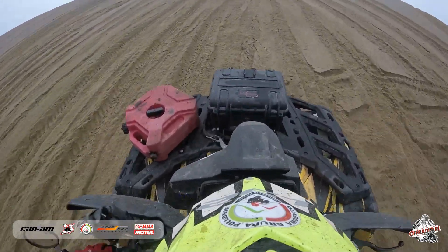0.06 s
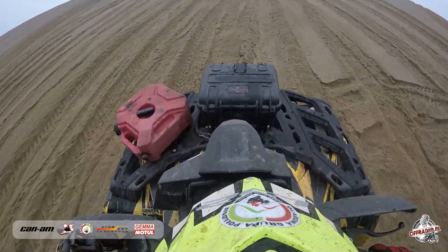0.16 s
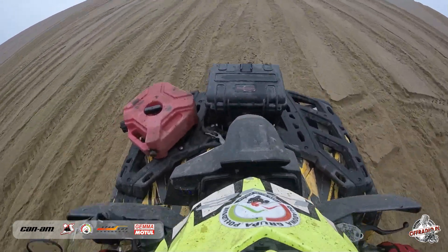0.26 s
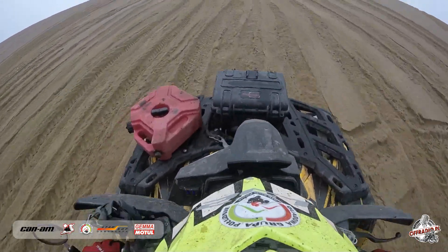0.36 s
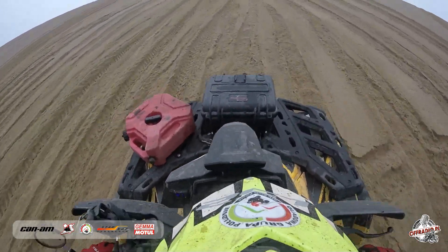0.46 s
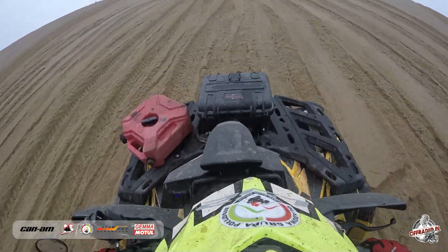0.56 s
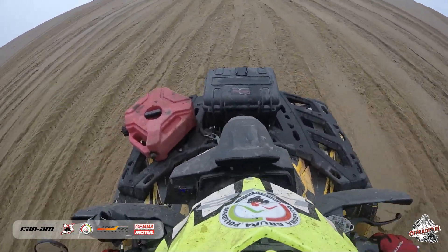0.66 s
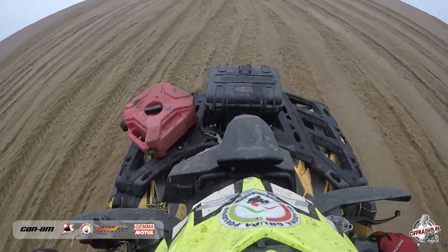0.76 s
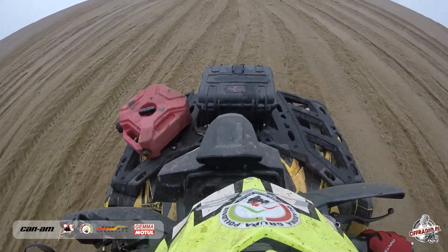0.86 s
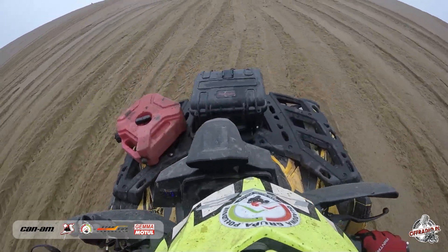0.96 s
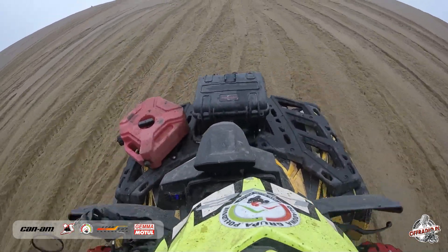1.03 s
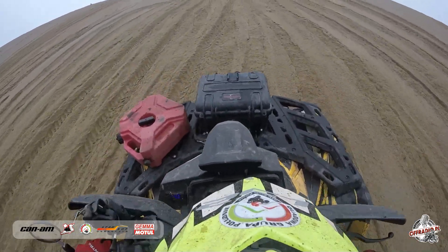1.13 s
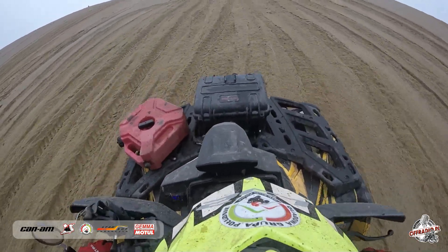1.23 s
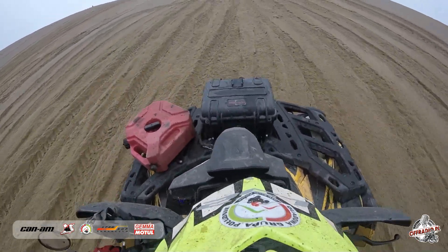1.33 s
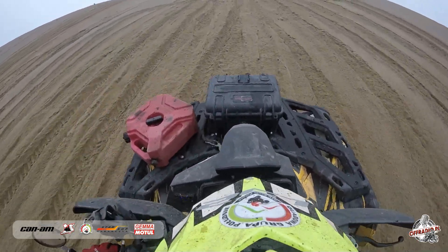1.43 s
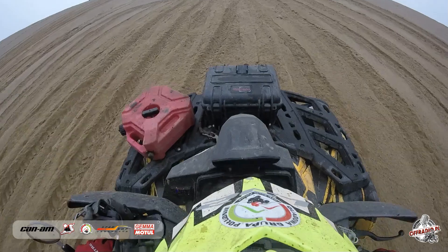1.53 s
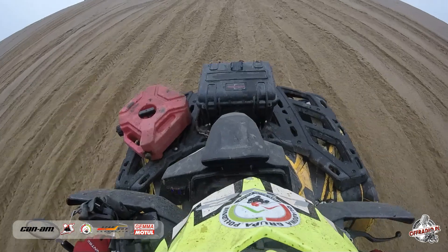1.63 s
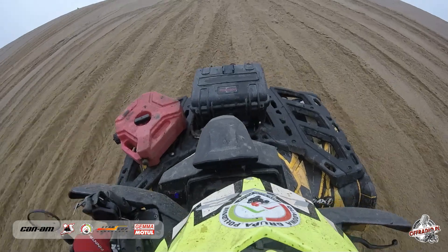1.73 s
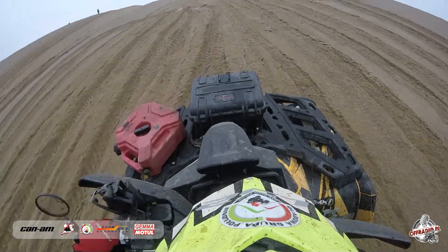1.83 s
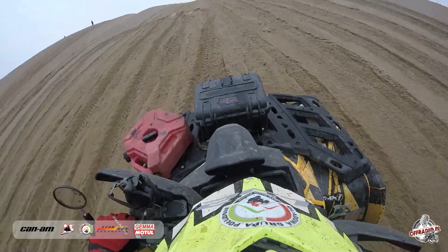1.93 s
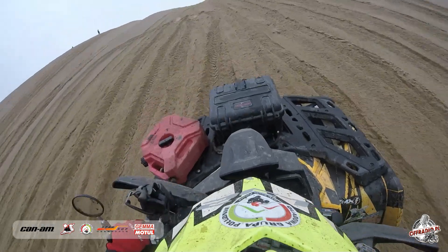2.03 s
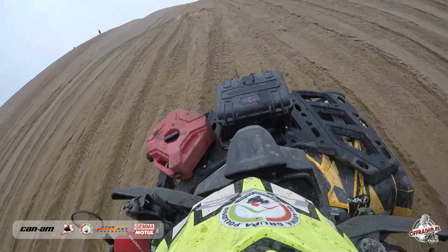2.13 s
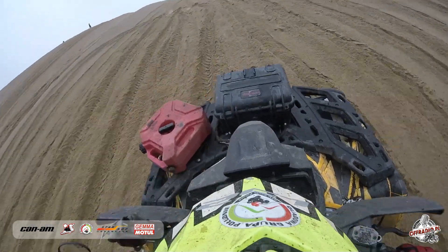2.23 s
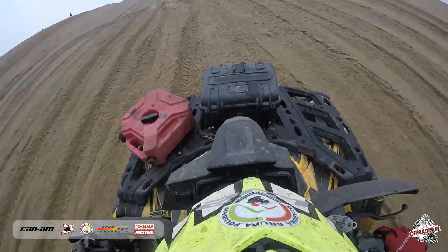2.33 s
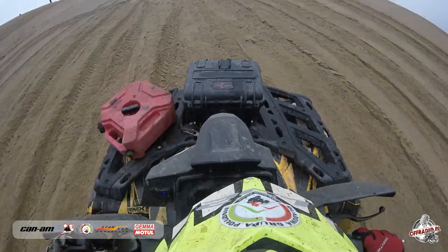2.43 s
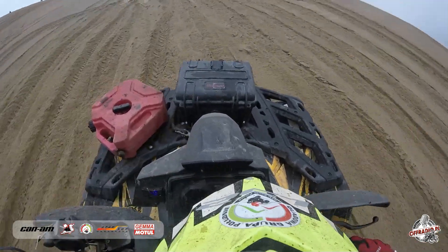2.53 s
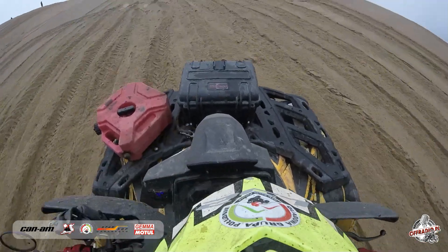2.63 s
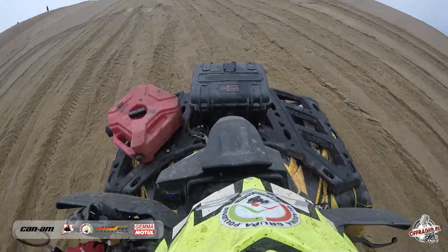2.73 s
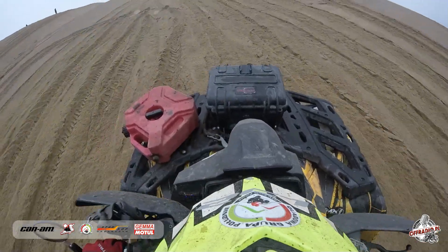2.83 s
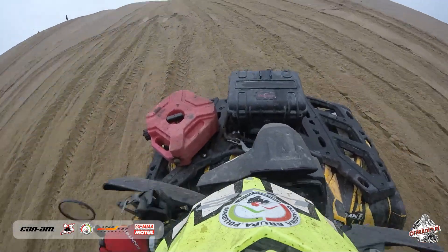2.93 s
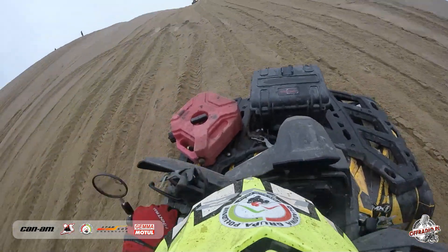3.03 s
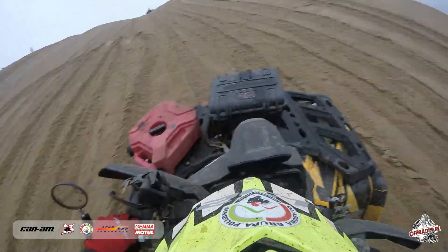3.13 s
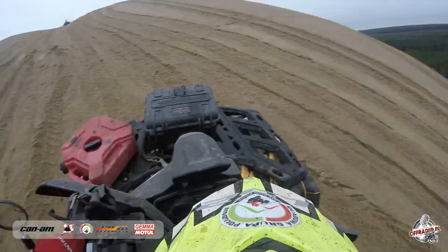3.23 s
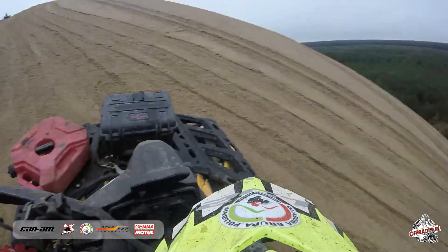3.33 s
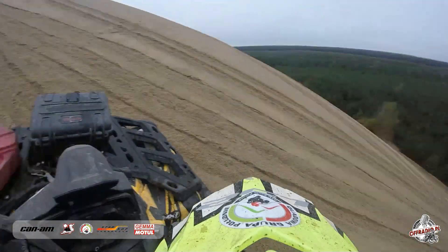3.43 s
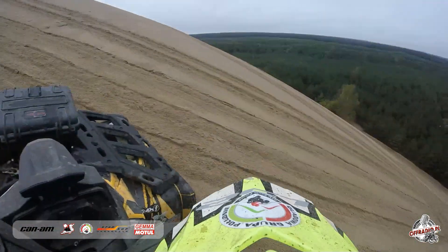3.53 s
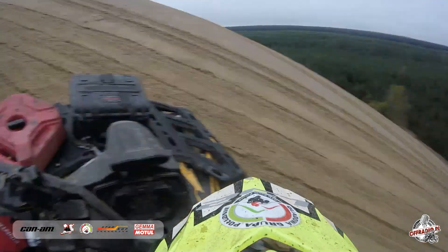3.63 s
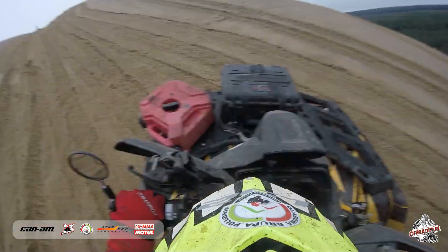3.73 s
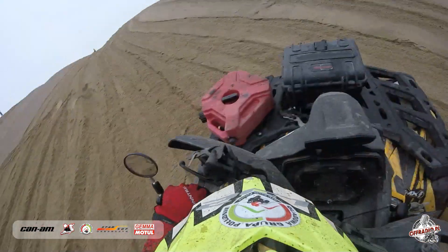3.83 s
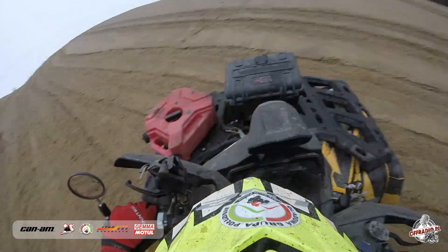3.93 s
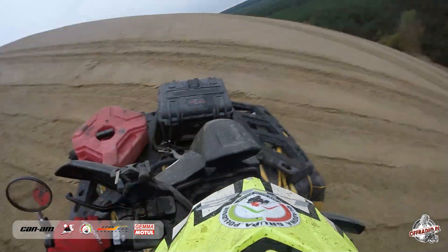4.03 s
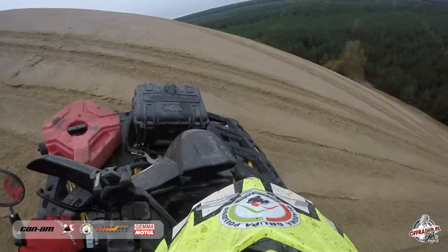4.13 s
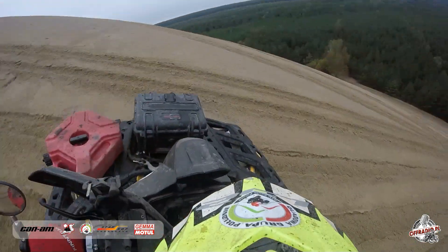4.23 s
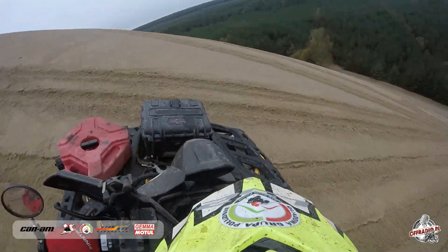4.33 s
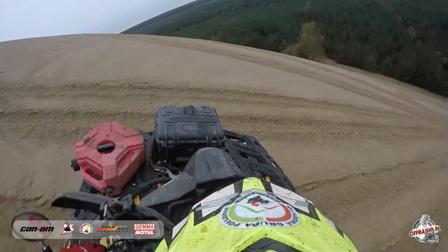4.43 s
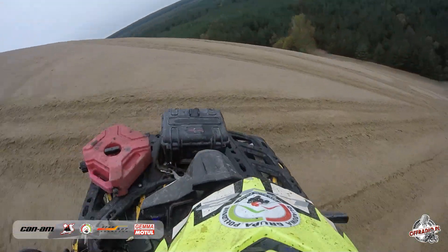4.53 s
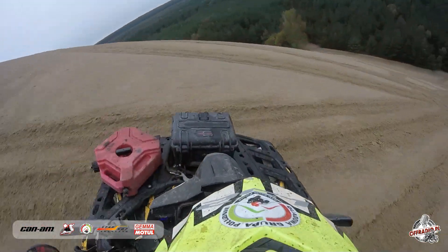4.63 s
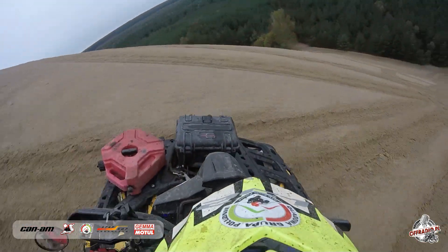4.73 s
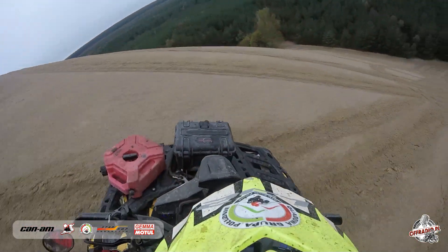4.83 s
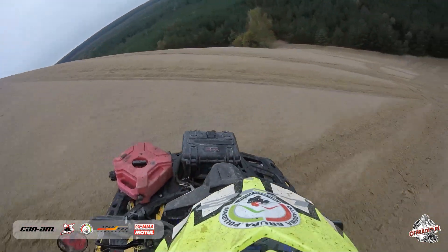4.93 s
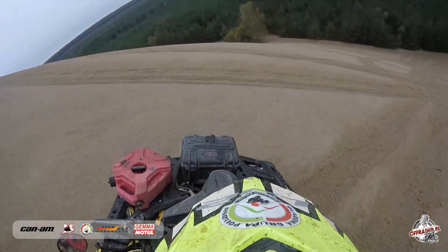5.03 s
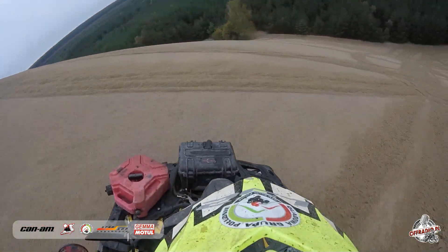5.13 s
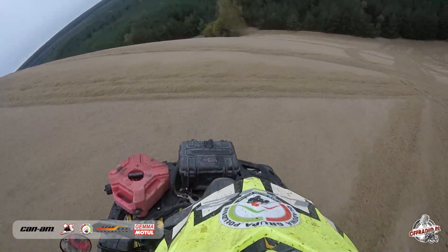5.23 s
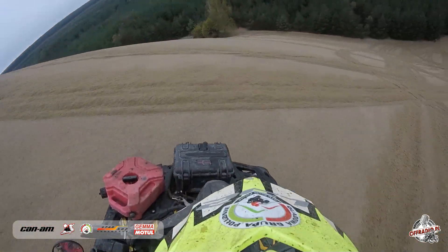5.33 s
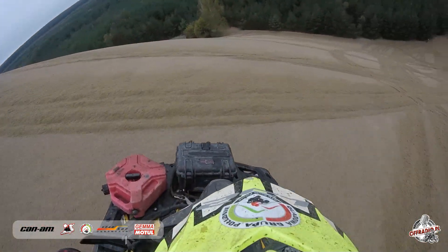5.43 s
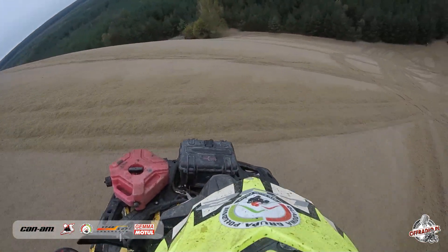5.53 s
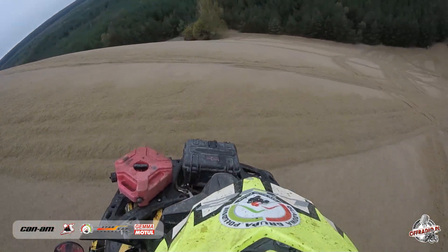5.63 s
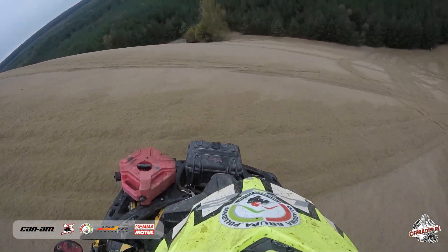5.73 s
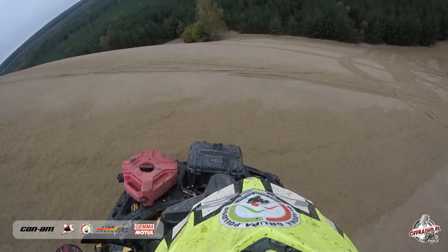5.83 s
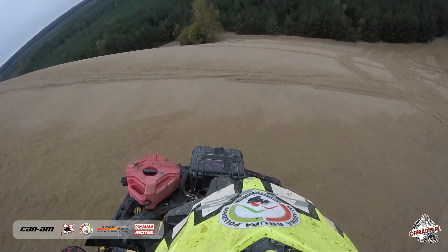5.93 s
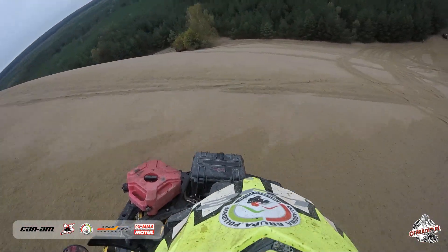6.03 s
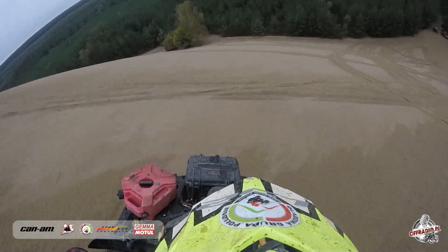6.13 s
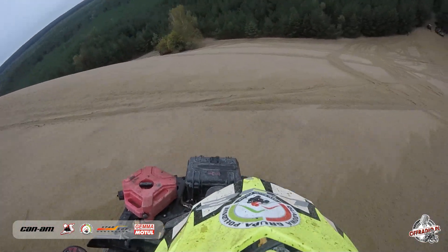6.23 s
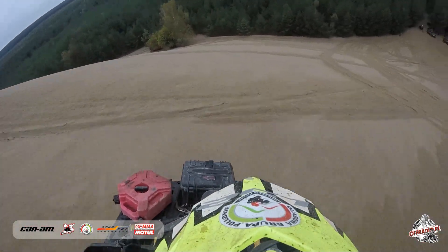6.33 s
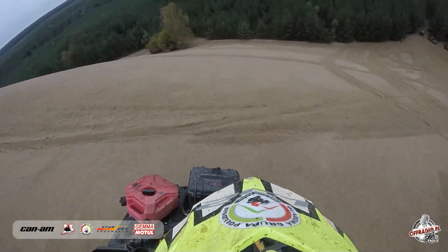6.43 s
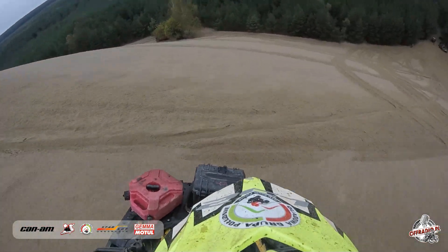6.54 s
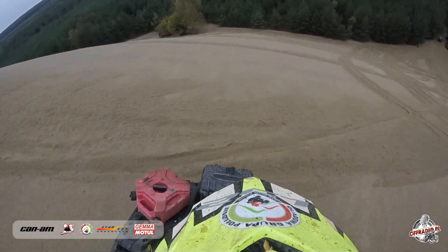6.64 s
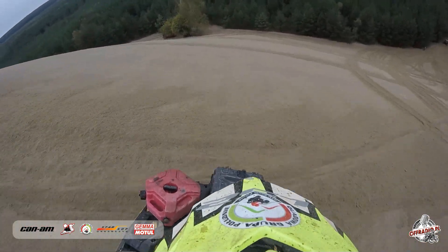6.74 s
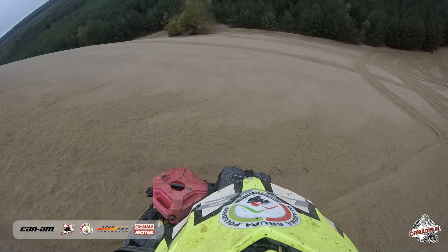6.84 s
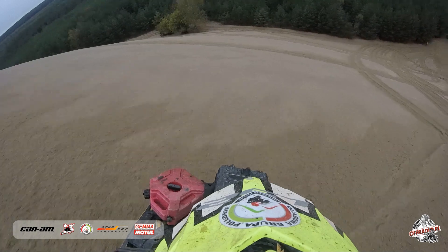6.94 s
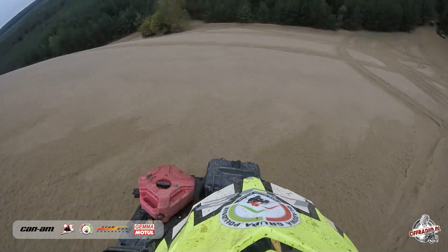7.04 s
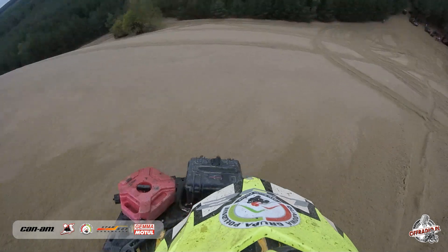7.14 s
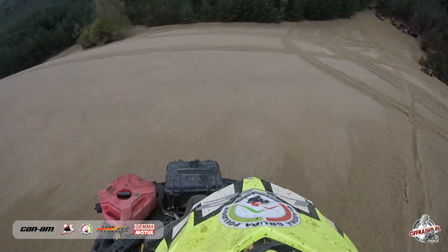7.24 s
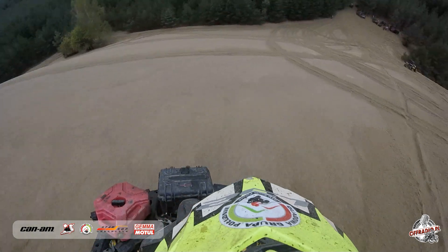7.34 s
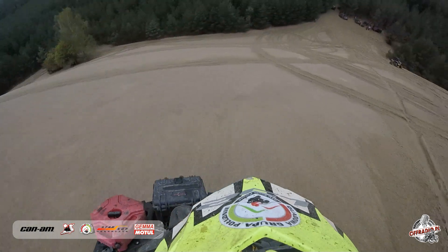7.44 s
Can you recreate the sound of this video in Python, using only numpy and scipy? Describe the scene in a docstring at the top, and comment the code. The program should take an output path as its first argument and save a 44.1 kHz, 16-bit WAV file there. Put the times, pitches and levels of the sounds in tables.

```python
"""A V-twin quad bike climbs a sand slope at full throttle, rolls off at the crest and drops to a hunting idle.
Its uneven firing radiates a harmonic series from the exhaust. The microphone sits in a closed plastic
case on the helmet, and every blow of valve or piston excites the case's resonance near 1.5 kHz.
Belt and intake rush, the casing hisses and panels ring. A low engine tone slides down as the revs fall,
a gear change knocks and gears whine faintly; behind are rolling noise, wind and two ticks of sand."""
import sys
import numpy as np
from scipy import signal
from scipy.fft import rfft, irfft, next_fast_len
from scipy.io import wavfile
from scipy.ndimage import uniform_filter1d, minimum_filter1d, map_coordinates

SR = 44100
rng = np.random.default_rng(int(sys.argv[2]) if len(sys.argv) > 2 else 0)


def dump(signal):
    """Clip the signal to [-1, 1] and save it as 16-bit WAV at the path in sys.argv[1]."""
    limited = np.clip(np.atleast_2d(signal).T, -1, 1)
    pcm = np.round(limited * 32767).astype(np.int16)
    wavfile.write(sys.argv[1], SR, pcm)


N = 329427
SHUT_S, NOISE_FADE_S = 4.36, 0.7  # the throttle shuts; the engine's noises fade as the revs fall


def exhaust(turns, cycle_hz):
    """Periodic firing radiates harmonics of the engine cycle; off throttle, pipe resonance shapes them."""
    # exhaust harmonics: order, load_db, shut_db (before the pipe colours it)
    orders = [(1, -46, -46), (2, -35.5, -42.5), (3, -32, -39.5), (4, -41, -38.5), (5, -31.5, -49),
              (6, -44, -48), (7, -47.5, -42.5), (8, -40, -47), (9, -39.5, -46.5), (10, -42, -48.5),
              (11, -37, -48), (12, -51.5, -61), (13, -52, -61), (14, -57, -62), (15, -60.5, -65)]
    # pipe response with the throttle shut: frequency_hz, gain_db
    pipe = [(25, -20), (45, -6.5), (65, -7.5), (95, 0.5), (125, -10.5), (200, -10.5), (400, -18.5),
            (800, -20)]
    # booms as the idle catches, keyed by order: centre_s, length_s, swell_db
    catches = {3: [(4.95, 0.19, 12.5), (5.55, 0.15, 17), (6.04, 0.26, 14.5), (6.32, 0.14, 13),
               (6.54, .08, 9), (6.71, .08, 7), (6.88, .1, 12.5), (7.13, .1, 3), (7.45, .08, 4)],
               4: [(5.2, .2, 2), (6.28, 0.068, 2), (6.45, 0.068, 7.5), (6.71, .08, 9.5), (6.93, .12, 6.5),
               (7.13, 0.18, 8.5), (7.39, 0.071, 4)]}
    firing_gap, between_catches_db = 280 / 720, -8.5  # the gap is a share of the cycle
    out, t = np.zeros(N), np.arange(N) / SR
    angle = 2 * np.pi * (turns - .12) + .02 * wobble(14)  # the crank turns a little unevenly
    overrun_db = 5.5 * np.clip((4.84 - t) / 0.04, 0, 1)  # wheels drive the engine until the belt lets go
    ease_db = -8.5 * np.clip(1 + (t - SHUT_S) / .2, 0, 1)  # the throttle eases: upper orders sag first
    pipe_hz, pipe_db = np.transpose(pipe)
    for k, load_db, shut_db in orders:
        idle_db = shut_db + np.interp(np.log(k * cycle_hz), np.log(pipe_hz), pipe_db) + 2.9 * wobble(10)
        idle_db += overrun_db + (between_catches_db + swells(catches[k]) if k in catches else 0)
        shut = ramp(length_s=0.12 if k <= 5 else 0.15)
        db = (1 - shut) * (load_db + (k > 5) * ease_db + 1.1 * wobble(3.49)) + shut * idle_db
        twin_phase = np.angle(1 + .4 * np.exp(-2j * np.pi * k * firing_gap))
        lag = 1.1 * max(k - 6, 0) ** 2  # the silencer delays what lies above its resonance
        out += amp(db + 0.37 * wobble(18)) * np.cos(k * angle + twin_phase - lag)
    return np.sqrt(2) * out


def clatter(turns, level_db):
    """Impulse excitation: valve and piston blows, each trailing chatter, ring the plastic case."""
    # blows within one cycle: cycle_share, level_db
    blows = [(.15, -6), (.42, -10), (.51, -10), (.67, 0), (.89, -9)]
    # the hardest piston blows: time_s, level_db
    hard_blows = [(0.361, -2.5), (0.4378, -5), (0.7291, -6), (0.7675, -6.5), (0.9786, -8.5), (1.3467, -4.5),
                  (1.3851, -7), (1.463, -11), (1.6196, -0.5), (1.6974, -4.5), (1.9284, -7.5), (2.2412, -6),
                  (2.3579, -4.5), (2.5714, -5.5), (2.7271, -4), (2.7655, -8.5), (3.0918, -4.5),
                  (3.2284, -3), (3.2479, -5), (3.5946, -8.5), (3.7697, -2.5), (3.848, -2.5), (3.9817, -3),
                  (4.0396, -6), (4.0591, -3.5), (4.3085, -7.5)]
    crest_db = 9.5  # peak of an ordinary main blow over the clatter's level
    cycles = np.arange(int(turns[-1]) - 1)
    hard_s, hard_db = np.transpose(hard_blows)
    hits, gate = np.zeros(N + 1), np.full(N, .15)
    for share, db in blows:
        wander, scatter, force = rng.standard_normal((len(cycles), 3)).T
        # play in the valve gear shifts the timing, more for the lighter blows
        late = amp(-db) * (.006 * uniform_filter1d(wander, size=9) + .0008 * scatter)
        at = np.interp(cycles + share + late, turns, np.arange(N))
        whole = at.astype(int)
        gap_s = np.abs(at[:, None] / SR - hard_s)
        hard_size = amp(hard_db[gap_s.argmin(axis=1)] - level_db[whole] - crest_db)
        size = np.where(gap_s.min(axis=1) < .002, hard_size, amp(db + 1.67 * force))
        hits += np.bincount(whole, size * (1 - at + whole), N + 1)  # split between adjacent samples
        hits += np.bincount(whole + 1, size * (at - whole), N + 1)
        gate += amp(db) * np.exp(-((turns - share) % 1) / 0.75)
    # slower turning gives fewer blows at the same mean power
    hits = hits[:N] / np.sqrt(np.abs(uniform_filter1d(hits[:N] ** 2, SR // 5)) + 1e-12)
    chatter = unit(gate * amp(0.43 * wobble(40)) * rng.standard_normal(N))
    chatter_share = np.interp(level_db, [-36, -22], [.6, .2])
    drive = np.sqrt(1 - chatter_share) * hits + np.sqrt(chatter_share) * chatter
    return amp(level_db) * case_ring(drive, rise_s=0.00072)


def case_ring(drive, rise_s=1e-6):
    """Resonance: the closed plastic case answers any blow most strongly near 1.5 kHz."""
    # response of the case: frequency_hz, gain_db
    response = [(470, -43.5), (800, -25), (976, -40.5), (1150, -21.5), (1290, -21.5), (1350, -8.5),
                (1390, -15), (1435, 3), (1520, 4.5), (1620, -3), (1715, 1.5), (1800, -8), (2050, -20.5),
                (2170, -24.5), (2700, -30.5), (4000, -68)]
    return coloured(drive, response, rise_s)


def rush(turns, level_db):
    """Amplitude modulation: belt and intake noise pulses slightly once an engine cycle."""
    # belt and intake spectrum: frequency_hz, relative_db
    spectrum = [(1350, -16), (2300, -1), (2440, -3), (2800, -10.5), (3190, -6), (3710, -15.5),
                (4140, -12.5), (4460, -18), (4820, -28), (5000, -27), (6500, -54.5), (11000, -120)]
    pulse_db = 0.31 * np.cos(2 * np.pi * (turns - .55))
    return amp(level_db + pulse_db + 0.24 * wobble(60)) * patchy(spectrum, patchy_db=0.5)


def sizzle(turns):
    """Resonant filtering: the engine casing hisses through its metallic modes, fading with the revs."""
    # engine casing spectrum: frequency_hz, relative_db
    spectrum = [(3500, -43.5), (4800, -22), (5200, -12), (5560, -4), (5800, -6), (6200, 0.5), (6650, -9),
                (7000, -9), (7450, -11), (7950, -8.5), (8400, -18), (8900, -14.5), (9600, -22),
                (11500, -31), (15200, -37)]
    load_db, shut_db = -47.5, -65.5
    db = load_db + (shut_db - load_db) * ramp(length_s=0.61) ** 1.56 + 0.4 * wobble(3.2)
    pulse_db = 0.94 * np.cos(2 * np.pi * (turns - .55))
    return amp(db + pulse_db + 0.28 * wobble(60)) * patchy(spectrum, patchy_db=1.5)


def panels(turns):
    """Forced vibration: firing and rattle drive narrow modes of the bodywork, silent once it idles."""
    # body panel modes: centre_hz, width_hz, level_db
    modes = [(332, 22, -45), (2184, 80, -40.5), (2367, 39, -48.5), (3152, 150, -45), (4070, 78, -55.5)]
    # a panel sings out, keyed by mode index: centre_s, length_s, swell_db
    sings = {1: [(2.6, 0.27, 2), (2.97, .12, 4.5)], 2: [(2.9, 0.27, 10.5), (3.3, .12, 7)],
             4: [(3.6, .45, 10.5), (4.3, .3, 3)]}
    driven_share, swing_db, shut_db = .85, 2, -10
    m = next_fast_len(N)
    out, hz, shut = np.zeros(N), np.fft.rfftfreq(m, 1 / SR), ramp(NOISE_FADE_S)
    kicks = unit(np.diff(np.floor(turns), prepend=0))  # one a cycle
    for k, (centre_hz, width_hz, db) in enumerate(modes):
        shake = np.sqrt(driven_share) * kicks + np.sqrt(1 - driven_share) * rng.standard_normal(N)
        ring = irfft(rfft(shake, m) / (1 + (2 * (hz - centre_hz) / width_hz) ** 2), m)
        out += amp(db + swells(sings.get(k, [])) + swing_db * wobble(5.5)) * unit(ring[:N])
    return out * amp(shut_db * shut) * np.sqrt(1 - shut)


def gear_knocks():
    """Impact and free decay: each gear contact rings the case, cracks and thumps the frame's modes."""
    # the gear knock and its rebounds: time_s, level_db, thump_relative_db
    contacts = [(5.424, -10.5, -32), (5.4252, -9.5, -29), (5.428, -10.5, -11.5), (5.433, -38, -26),
                (5.437, -24.5, -3), (5.466, -34.5, -12), (6.11, -43, -20), (6.14, -33, -9)]
    # frame modes: pitch_hz, relative_db, t60_s
    modes = [(99, -0.5, 0.14), (198, -7.5, 0.14), (263.4, -4.5, 0.21), (419, -12, 0.15), (2660, 1, 0.031),
             (3630, -6, 0.027)]
    # spectrum of the crack: frequency_hz, relative_db
    crack_spectrum = [(700, -38), (1200, -16), (2000, 2.5), (2700, -3), (3200, -7), (3650, -13),
                      (5500, -20.5), (9000, -32), (13000, -58)]
    t = np.arange(SR // 4) / SR
    taps, cracks, frame = np.zeros(N), np.zeros(N + SR), np.zeros(N + SR)
    thump = sum(amp(db - 60 * t / t60) * np.sin(2 * np.pi * hz * t) for hz, db, t60 in modes)
    thump *= 1 - np.exp(-t / .001)
    for time_s, db, thump_db in contacts:
        at = round(time_s * SR)
        taps[at] = amp(db + 16.0)
        crack_envelope = amp(db - 14 - 60 * t / 0.04) * (1 - np.exp(-t / .002))
        cracks[at:][:len(t)] += crack_envelope * rng.standard_normal(len(t))
        frame[at:][:len(t)] += amp(db + thump_db) * thump
    return case_ring(taps) + coloured(cracks[:N], crack_spectrum) + frame[:N]


def gliding_tones():
    """Frequency glides: a low engine tone slides down as the revs fall, and thin whines swell and fade."""
    # tones: start_s, loudest_s, end_s, from_hz, to_hz, glide_exponent, ends_db, loudest_db
    tones = [(6.45, 7.23, 7.46, 2100, 1560, 0.5, -58, -38), (5.55, 5.7, 6, 850, 960, 1.1, -63, -55),
             (4.0, 4.55, 4.68, 290, 250, 2.2, -46, -41.5), (4.68, 4.75, 4.86, 258, 232, 1.6, -42.5, -34),
             (6.05, 6.15, 6.22, 410, 390, 1.1, -62, -51), (5.2, 5.35, 6, 150, 250, 1.103, -52, -46),
             (7.39, 7.46, 7.5, 2040, 2050, 1.1, -44, -34.5)]
    out, t = np.zeros(N), np.arange(N) / SR
    for start, loudest, end, from_hz, to_hz, bend, ends_db, loudest_db in tones:
        hz = from_hz + (to_hz - from_hz) * np.clip((t - start) / (end - start), 0, 1) ** bend
        db = np.interp(t, [start, loudest, end], [ends_db, loudest_db, ends_db]) + 2.2 * wobble(35)
        fade = np.clip(np.minimum(t - start, end - t) / 0.026, 0, 1)
        phase = 2 * np.pi * np.cumsum(hz * (1 + 0.0047 * wobble(40))) / SR
        out += fade * amp(db) * np.sin(phase)
    return out


def rolling(level_db):
    """Random excitation: rolling gives a flickering band of noise, strongest near 1.6 kHz."""
    # rolling spectrum: frequency_hz, relative_db
    spectrum = [(530, -41), (900, -27), (1080, -22), (1150, -13), (1500, 2.5), (1590, 4.5), (1630, -3),
                (1810, -1.5), (2140, -4.5), (2270, -7.5), (2480, -5), (2860, -17.5), (3270, -13.5),
                (5000, -36.5), (6500, -66.5), (11000, -120)]
    return amp(level_db + 1.1 * wobble(45)) * patchy(spectrum, patchy_db=1.5)


def rumble():
    """Pressure fluctuations from wind and tyres make a low, lumpy noise, weaker while coasting."""
    # wind and tyre spectrum: frequency_hz, relative_db
    spectrum = [(5, 2.5), (16, -12.5), (33, -19), (65, -12.5), (95, -7), (125, -12), (196, -12), (340, -12),
                (526, -16), (602, -15.5), (946, -20), (1200, -24.5), (1600, -66)]
    load_db, coast_db = -40, -50
    buffeting = amp(0.9 * wobble(12)) * rng.standard_normal(N)
    return amp(load_db + ramp(NOISE_FADE_S) * (coast_db - load_db)) * unit(coloured(buffeting, spectrum))


def grit():
    """Brief impacts excite high frequencies: sand grains tick against the case."""
    # grain strikes: time_s, level_db
    grains = [(.084, -21.5), (0.1292, -41.5)]
    out, t = np.zeros(N), np.arange(300) / SR
    ring = np.sin(2 * np.pi * 3750 * t) + 0.36 * np.sin(2 * np.pi * 4900 * t)
    for time_s, db in grains:
        scratch = np.diff(rng.standard_normal(len(t) + 1)) / 6
        out[round(time_s * SR):][:len(t)] += amp(db - 60 * t / 0.012) * (scratch + ring)
    return out


def amp(db):
    """Decibels to amplitude ratio."""
    return 10 ** (np.asarray(db) / 20)


def unit(x):
    """Normalisation to rms 1."""
    return x / np.sqrt(np.mean(x ** 2) + 1e-20)


def curve(rows):
    """Linear interpolation of (time_s, value) rows at every sample."""
    return np.interp(np.arange(N) / SR, *np.transpose(rows))


def ramp(length_s):
    """Linear transition: 0 under load, rising to 1 over length_s once the throttle shuts."""
    return np.clip((np.arange(N) / SR - SHUT_S) / length_s, 0, 1)


def swells(rows):
    """Gaussian rises in dB from (centre_s, length_s, swell_db) rows."""
    return sum(db * np.exp(-(2 * (np.arange(N) / SR - s) / length) ** 2) for s, length, db in rows)


def wobble(rate):
    """Smooth random modulation: a spline through rate knots a second."""
    return map_coordinates(rng.standard_normal(int(N * rate / SR) + 4), [np.arange(N) * rate / SR])


def coloured(x, points, rise_s=1e-6, size=8192):
    """Convolution with a minimum-phase response, given an onset of rise_s and scaled to unit energy."""
    hz, db = np.transpose(points)
    log_hz = np.log(np.fft.rfftfreq(size, 1 / SR) + 1)
    cepstrum = irfft(np.log(amp(np.interp(log_hz, np.log(hz), np.maximum(db, -100)))))
    cepstrum[1:size // 2] *= 2  # folding onto positive time makes the filter causal
    cepstrum[size // 2 + 1:] = 0
    onset = 1 - np.exp(-np.arange(1, size + 1) / SR / rise_s)
    pulse = irfft(np.exp(rfft(cepstrum))) * onset
    return signal.fftconvolve(x, pulse / np.linalg.norm(pulse))[:N]


def patchy(points, patchy_db):
    """Coloured noise of rms 1, randomly modulated in small patches of time and frequency."""
    cells = signal.stft(rng.standard_normal(N), nperseg=512)[2]
    field = uniform_filter1d(rng.standard_normal(cells.shape), size=4, axis=0)
    field = uniform_filter1d(field, size=10, axis=1)
    noise = signal.istft(cells * amp(patchy_db * unit(field)), nperseg=512)[1][:N]
    return unit(coloured(noise, points))


def scene():
    """Superposition of all sources at the helmet; one cycle rate times the engine's sounds."""
    # engine cycle rate (half the crank rate), hunting at full throttle: time_s, cycle_hz
    climb = [(0.0, 50.57), (0.265, 52.28), (0.581, 51.3), (0.912, 52.43), (0.974, 51.73), (1.673, 51.31),
             (1.799, 52.13), (2.027, 51.37), (2.029, 50.98), (2.768, 51.7), (2.942, 52.69), (3.186, 51.02),
             (3.53, 52.43), (3.784, 50.72), (3.834, 51.95), (4.35, 51.93)]
    # engine cycle rate after the crest: time_s, cycle_hz
    coast = [(4.42, 50.4), (4.81, 38.8), (4.97, 29.5), (5.06, 25.8), (5.18, 23.1), (5.39, 29.8),
             (5.47, 31.5), (5.95, 33.0), (6.1, 28.7), (6.24, 26.7), (7.47, 25.7)]
    # clatter in the case: time_s, level_db
    clatter_levels = [(0, -20), (.08, -16.5), (.6, -18), (1.02, -16.5), (1.2, -18.5), (1.6, -17),
                      (2.45, -18), (2.6, -15.5), (3, -19), (3.22, -15), (3.55, -22), (3.75, -15.5),
                      (4.36, -18.5), (4.45, -26), (4.55, -23.5), (4.65, -35.5), (4.78, -34), (5.1, -50),
                      (5.4, -40.5), (6.03, -57), (6.87, -49.5), (7.18, -42), (7.47, -52)]
    # rolling noise: time_s, level_db
    roll_levels = [(0, -49.5), (4.3, -50), (4.45, -34.5), (4.65, -35.5), (5.14, -47), (5.4, -43.5),
                   (6.03, -39.5), (7.18, -42), (7.47, -39.5)]
    cycle_hz, clatter_db, roll_db = curve(climb + coast), curve(clatter_levels), curve(roll_levels)
    turns, shut = np.cumsum(cycle_hz) / SR, ramp(NOISE_FADE_S)  # turns counts engine cycles
    # the rush follows the clatter's swings under load, then the rolling noise
    swing_db = clatter_db - np.median(clatter_db[:round(SHUT_S * SR)])
    rush_db = (1 - shut) * (-34 + 0.47 * swing_db) + shut * (roll_db - 9.5)
    engine = exhaust(turns, cycle_hz) + clatter(turns, clatter_db) + rush(turns, rush_db)
    engine += sizzle(turns) + panels(turns)
    return (engine + rolling(roll_db) + rumble() + gear_knocks() + gliding_tones() + grit())[None]


def record(dry):
    """The case cancels a narrow band; microphone self-noise, peak limiting and a band limit follow."""
    # microphone hiss: frequency_hz, relative_db
    hiss_spectrum = [(900, -37.5), (3000, -4), (9000, 8), (15300, -4.5)]
    notch_hz, ceiling, top_hz = 2270, .75, 15200
    m = next_fast_len(N + SR // 2)
    hz = np.fft.rfftfreq(m, 1 / SR)
    notch = 1 - 0.78 / (1 + ((hz - notch_hz) / 55) ** 4)
    hiss = amp(-73.5) * coloured(rng.standard_normal(N), hiss_spectrum)
    sound = irfft(rfft(dry, m) * notch, m)[..., :N] + hiss
    needed_gain = np.minimum(1, ceiling / (np.abs(sound) + 1e-9))
    gain = uniform_filter1d(minimum_filter1d(needed_gain, size=301), size=151)
    return irfft(rfft(sound * gain, m) * (hz < top_hz), m)[..., :N]


dry = scene()
out = record(dry)
dump(out)
```